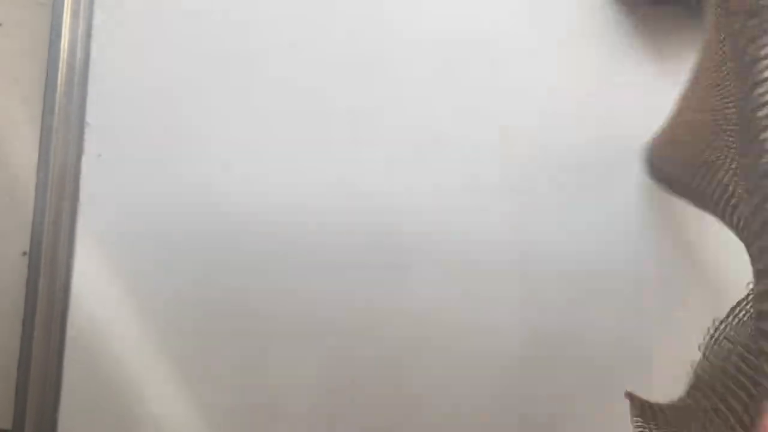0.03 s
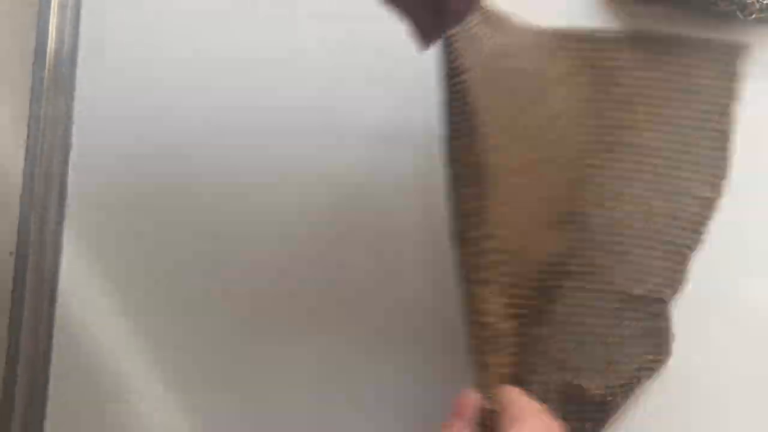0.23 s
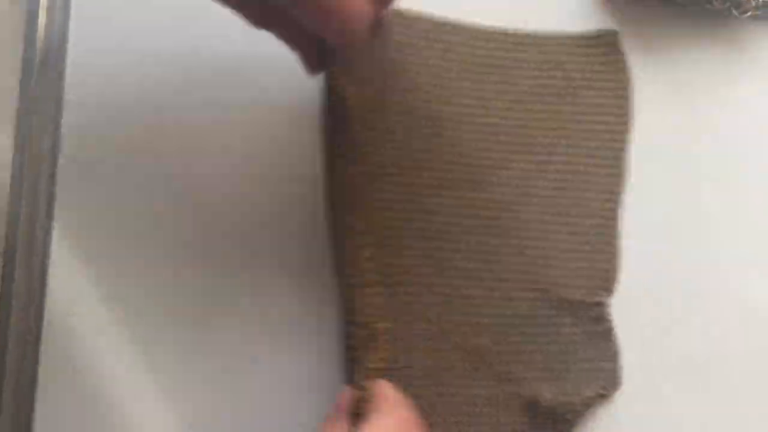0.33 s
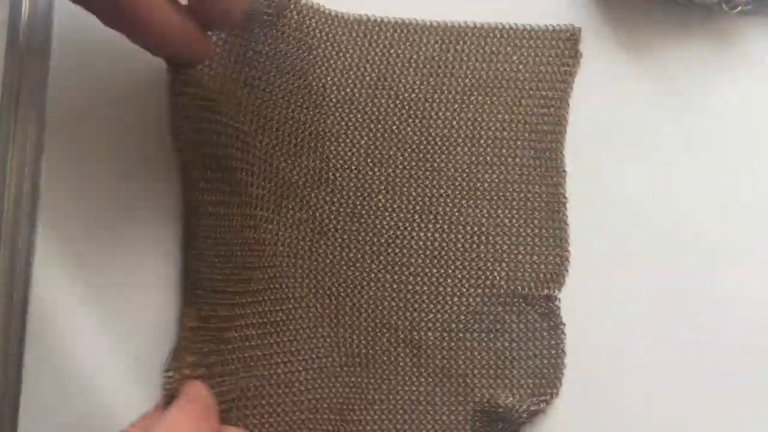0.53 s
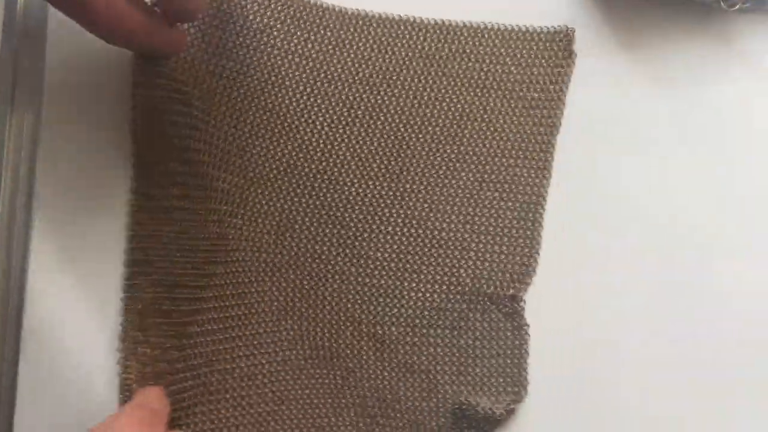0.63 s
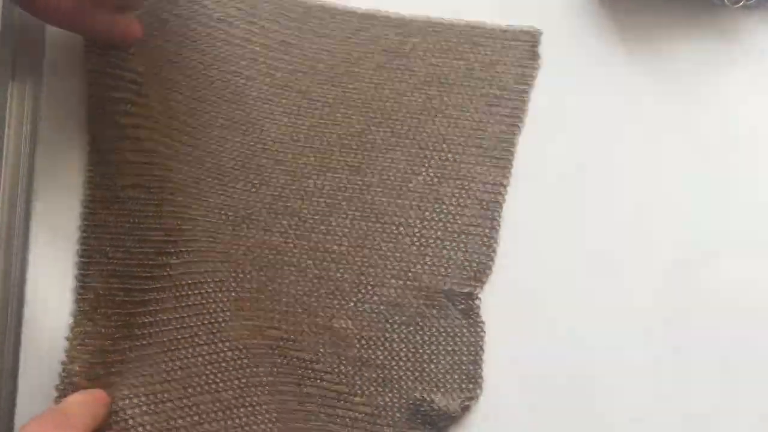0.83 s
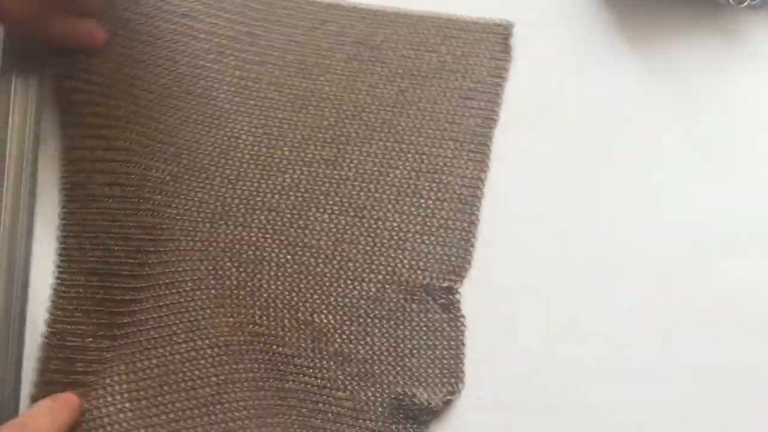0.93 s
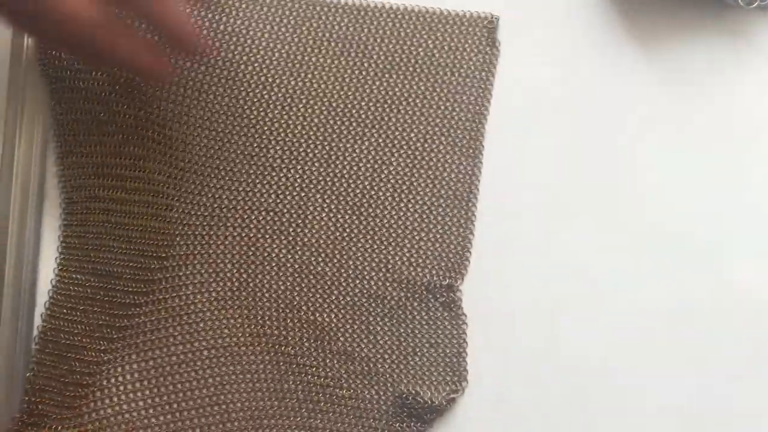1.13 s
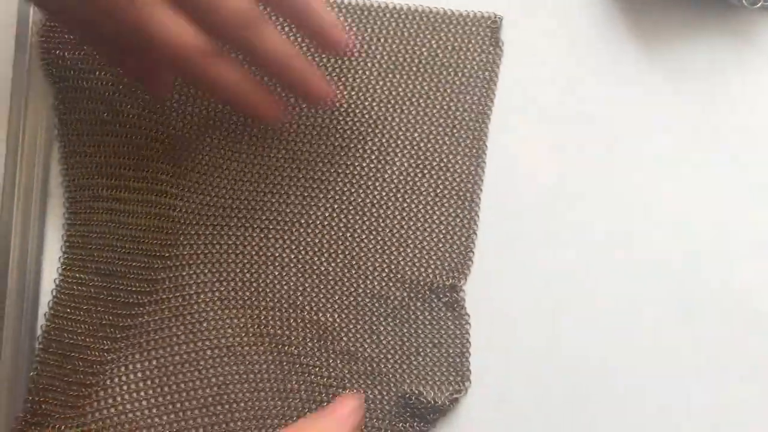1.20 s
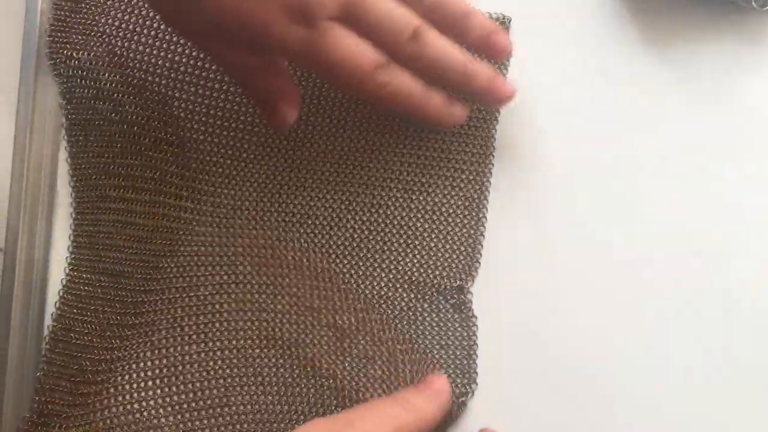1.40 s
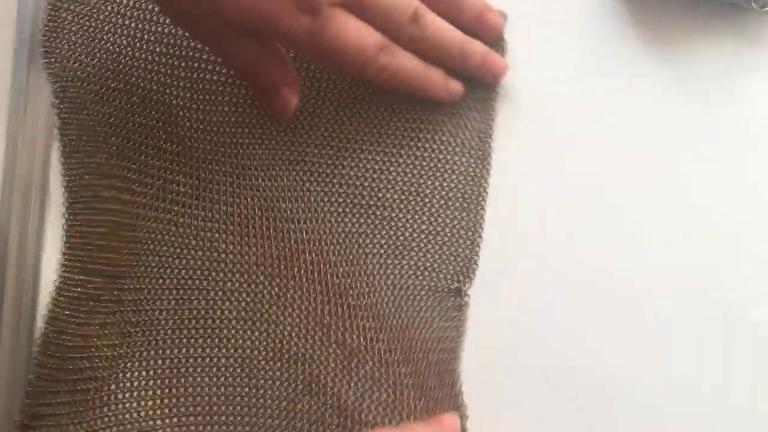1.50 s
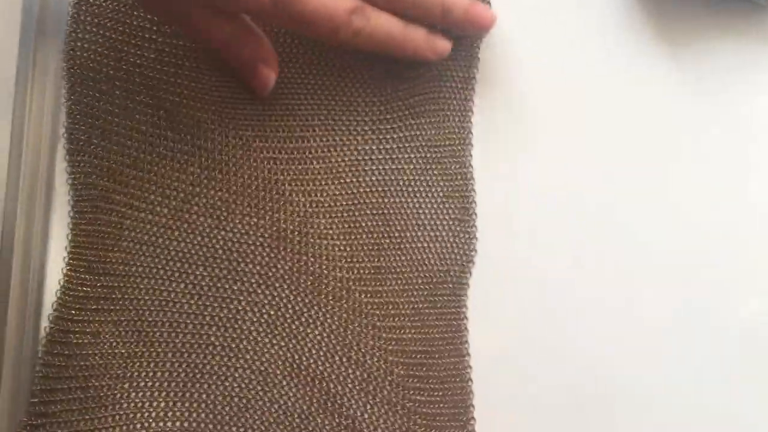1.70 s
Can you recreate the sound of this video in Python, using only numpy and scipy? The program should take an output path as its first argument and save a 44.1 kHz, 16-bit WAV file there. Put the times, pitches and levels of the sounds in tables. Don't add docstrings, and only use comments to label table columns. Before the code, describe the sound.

Fine metal ring mesh stirs faintly, then swishes from 0.2 seconds and lands loudly around 0.3 on a hollow tabletop, a dense bright jingle with a woody knock. Softer rustling follows, with small slaps and clinks near 0.6, over low air rumble. A short hissing drag comes at 1.0 to 1.15, then near quiet, light finger taps around 1.4, and a faint rustle at 1.6. Close, quiet room, slight hum.

```python
import sys
import numpy as np
from scipy import signal
from scipy.fft import rfft, irfft
from scipy.io import wavfile
from scipy.ndimage import uniform_filter1d

SR = 44100
rng = np.random.default_rng(int(sys.argv[2]) if len(sys.argv) > 2 else 0)


def store_pcm(level_fs):
    pcm = np.round(np.clip(level_fs, -1, 1) * 32767).astype(np.int16)
    wavfile.write(sys.argv[1], SR, np.atleast_2d(pcm).T)


def boost(x):
    u = np.asarray(x, float) / 20
    return 10 ** u


N = 77175


def unit(x):
    return x / np.sqrt(np.mean(x ** 2))


def colour(x, points):
    hz, db = np.array(points).T
    f = np.maximum(np.fft.rfftfreq(4096, 1 / SR), 1)
    cepstrum = irfft(np.interp(np.log(f), np.log(hz), db) * np.log(10) / 20)
    cepstrum[1:2048] *= 2
    cepstrum[2049:] = 0
    return signal.fftconvolve(x, irfft(np.exp(rfft(cepstrum))))[:N]


def mode(x, hz, db, t60):
    r = np.exp(-np.log(1000) / (t60 * SR))
    ringing = signal.lfilter([0, 1], [1, -r * np.exp(2j * np.pi * hz / SR)], x).imag
    return boost(db) * np.sqrt(1 - r) * ringing


def walk(rate):
    k = int(SR / rate)
    return unit(uniform_filter1d(uniform_filter1d(rng.standard_normal(N), k), k))


# f/Hz, level/dB
ROOM_COLOUR = [(30, -1), (150, 10), (260, -3), (800, -7), (2000, -6.5), (4000, -13), (7000, -40),
               (16000, -46)]


def room(t):
    floor_db, hum_db, hum_hz = -64, -71.5, 151
    hum = boost(hum_db + 3.3 * walk(24)) * np.sin(2 * np.pi * hum_hz * t)
    return boost(floor_db) * unit(colour(rng.standard_normal(N), ROOM_COLOUR)) + hum


# t/s, level/dB
AIR_PUSH = [
    (0, -69),
    (.29, -86),
    (.33, -50.5),
    (.56, -49.5),
    (.72, -50.5),
    (1.0, -60.5),
    (1.061, -76),
    (1.63, -67),
    (1.75, -71),
]
# f/Hz, level/dB
AIR_COLOUR = [(20, -43), (45, -13), (70, 6), (110, 1.5), (155, -1.5), (190, -9), (300, -21), (600, -19)]


def air(t):
    s, db = np.array(AIR_PUSH).T
    flutter_db = 2.5 * walk(12)
    return unit(colour(rng.standard_normal(N), AIR_COLOUR)) * boost(np.interp(t, s, db) + flutter_db)


# t/s, level/dB, f/Hz, t60/s
PINGS = [(0.122, -44.5, 4680, 0.015), (0.316, -47, 152.7, 0.97), (.653, -39, 5900, 0.016),
         (0.654, -33, 1600, 0.034), (0.669, -37, 1610, .03), (1.133, -46, 6730, 0.031),
         (1.29, -76, 3100, 0.062), (1.3, -58, 4350, 0.087), (1.308, -63, 3870, 0.087),
         (1.318, -62, 4570, .08), (1.414, -48, 4200, 0.018), (1.417, -42, 5800, 0.016),
         (1.425, -58, 355, 0.18), (1.437, -53, 607, 0.2), (1.661, -47, 99, .1), (1.702, -47.5, 5630, 0.051)]


def pings(t):
    total = np.zeros(N)
    for start, db, hz, t60 in PINGS:
        age = t - start
        fade = boost(db - 60 * np.maximum(age, 0) / t60)
        total += (age >= 0) * fade * np.sin(2 * np.pi * hz * age)
    return boost(2.0 * walk(220)) * total


# t/s, level/dB, push/s
TAPS = [
    (.005, -54.5, 0.0011),
    (0.283, -48, 0.0025),
    (0.328, -37.5, 0.0012),
    (1.381, -52, 0.0016),
    (1.395, -47, 0.00063),
    (1.409, -59.5, 0.002),
    (1.421, -57.5, 0.0018),
    (1.655, -53.5, 0.0011),
]
# f/Hz, level/dB, t60/s
SOFT_MODES = [(297, -9, 0.026), (355, -8.5, .1), (650, 3, .035)]


def fingers(t):
    force = np.zeros(N)
    for start, db, push in TAPS:
        force += boost(db) * np.sin(2 * np.pi * np.clip((t - start) / push, 0, 1))
    return sum(mode(force, *m) for m in SOFT_MODES)


# t/s, level/dB, weight on the board/dB, sparkle/dB
MOTION = [(0, -55.5, -4.5, 2.5), (.1, -66, -4.5, -1), (0.17, -67.5, -5, -16), (0.189, -32, -9, -2.5),
          (0.234, -33, -9.5, -0.5), (0.293, -20, -7.5, -1), (0.363, -27.5, -10, 1.5),
          (0.408, -37.5, -11.5, -1), (0.503, -37, -10, -6), (0.538, -44.5, -7.5, -10),
          (0.661, -42, -9, -0.5), (0.732, -48, -33, -1), (0.978, -44.5, -13, 1), (1.043, -31, -17, 0.5),
          (1.192, -72.5, -13, -6), (1.46, -60, -4, -3), (1.609, -45, -16, 2), (1.75, -55, -3, 4.5)]
# t/s, peak level/dB, weight on the board/dB, t60/s
SLAPS = [(0.123, -42.5, -26, 0.019), (.165, -51.5, -11, 0.022), (.176, -38, -7, 0.035),
         (0.184, -42, -13, 0.12), (0.288, -30.5, 2.5, .08), (0.482, -40, 5, 0.029), (0.578, -45, 3, .12),
         (0.596, -36, 4, 0.046), (0.609, -34.5, -6, 0.096), (0.652, -32, -20, 0.081),
         (1.009, -38, -13, .08), (1.067, -39, -6, .04), (1.102, -58, -3, 0.014), (1.122, -71, -14, .015),
         (1.129, -46.5, -19, 0.044), (1.186, -54, -5.5, .015), (1.413, -44, -14, 0.017),
         (1.43, -51.5, -9.5, 0.29), (1.655, -63, -2, 0.03), (1.737, -62, -14, 0.015)]


def effort(t):
    heavy_db, crack_db, rise_s = -8, 6, .0008
    s, db, weight, sparkle = np.array(MOTION).T
    tick = boost(np.interp(t, s, db)) ** 2
    push = tick * boost(np.interp(t, s, weight)) ** 2
    bright = tick * boost(np.interp(t, s, sparkle)) ** 2
    crack = np.zeros(N)
    for start, peak_db, weight_db, dies in SLAPS:
        crisp = min(boost(heavy_db - weight_db), 1)
        fade = boost(peak_db - 60 * np.maximum(t - start, 0) / dies) ** 2
        burst = np.clip((t - start) / rise_s, 0, 1) * fade
        tick = tick + burst
        push = push + burst * boost(weight_db) ** 2
        bright = bright + burst * crisp ** 2
        crack[int(start * SR)] = crisp * boost(peak_db + crack_db)
    return np.sqrt(tick), np.sqrt(push), np.sqrt(bright / tick), crack


def contacts(tick):
    per_s, busy_db, thins = 18000, -34, .2
    scatter_db, clump_db, clumps_per_s = 2.4, 1.3, 150
    odds = per_s / SR * np.minimum(tick / boost(busy_db), 1) ** thins
    sign = np.sign(rng.standard_normal(N))
    size = sign * boost(scatter_db * rng.exponential(size=N) + clump_db * walk(clumps_per_s))
    return unit((rng.random(N) < odds) * size / np.sqrt(odds))


def patch():
    patchy_db, shifts_per_s = 2.2, 40
    return boost(patchy_db * walk(shifts_per_s))


# f/Hz, level/dB
TICK_COLOUR = [(170, -39), (330, -23), (1300, -3), (3500, -3), (6300, -2), (8500, -4), (12500, -6),
               (16000, -7.5)]
# f/Hz, level/dB, t60/s
RING_MODES = [(4200, -2, .01), (4600, 0, .012), (5300, 0, .01), (5800, 0, .01), (6400, 0, .008),
              (7000, -3, .008), (8100, -7, .006), (12200, -6, .003), (13500, -7, .003)]


def metal(ticks, bright):
    rings_db, sparkle_hz = -5, 6800

    def as_strong_as_ticks(y):
        return y / np.sqrt(np.sum(y ** 2) / np.sum(ticks ** 2))

    kind = rng.integers(len(RING_MODES), size=N)
    rings = sum(mode(ticks * (kind == k) * patch(), *m) for k, m in enumerate(RING_MODES))
    bare = as_strong_as_ticks(colour(ticks, TICK_COLOUR))
    full = bare + boost(rings_db) * as_strong_as_ticks(rings)
    dull = signal.sosfiltfilt(signal.butter(4, sparkle_hz, fs=SR, output="sos"), full)
    return dull + bright * (full - dull)


# f/Hz, level/dB, t60/s
BOARD_MODES = [(580, -6, .04), (645, 0, .07), (740, -9, .03), (880, -8, .025), (1080, -4, .03),
               (1250, -8, .02), (1500, -5, .025), (1665, -3, .04), (1950, -6, .025), (2280, -7, .035),
               (2560, -7, .055), (3000, -9, .025)]


def board(hits, ticks, push):
    stiff_hz, stiff_db, cut_hz = 1300, -5, 540
    bend = hits * push
    knock = np.sign(ticks) * boost(stiff_db) * np.sqrt(np.abs(ticks * hits) * push)
    total = sum(mode(patch() * (bend if m[0] < stiff_hz else knock), *m) for m in BOARD_MODES)
    return signal.sosfilt(signal.butter(6, cut_hz, "high", fs=SR, output="sos"), total)


def mesh(t):
    tick, push, bright, crack = effort(t)
    hits = contacts(tick)
    ticks = hits * tick + crack
    return metal(ticks, bright) + board(hits, ticks, push)


def scene():
    echo_t60_s, echo_db = .16, -8
    t = np.arange(N) / SR
    near = mesh(t) + fingers(t) + pings(t)
    tail = rng.standard_normal(SR // 2) * boost(-60 * t[:SR // 2] / echo_t60_s)
    echo = signal.fftconvolve(near, tail / np.sqrt(np.sum(tail ** 2)))[:N]
    return (near + boost(echo_db) * echo + air(t) + room(t))[None]


def band_limit(x):
    return signal.sosfilt(signal.butter(12, 16500, fs=SR, output="sos"), x)


def record(dry):
    notch_hz, notch_width_hz, notch_db = 10500, 600, -8
    top_hz, bass_cut_hz, ceiling = 15950, 45, .4
    dip = signal.lfilter(*signal.iirpeak(notch_hz, notch_hz / notch_width_hz, fs=SR), dry)
    dipped = dry - (1 - boost(notch_db)) * dip
    cut = signal.sosfilt(signal.ellip(12, .2, 70, top_hz, fs=SR, output="sos"), dipped)
    rounded = ceiling * np.tanh(cut / ceiling)
    mix = signal.lfilter(*signal.butter(2, bass_cut_hz, "high", fs=SR), rounded)
    return band_limit(mix)


dry = scene()
out = record(dry)
store_pcm(out)
```